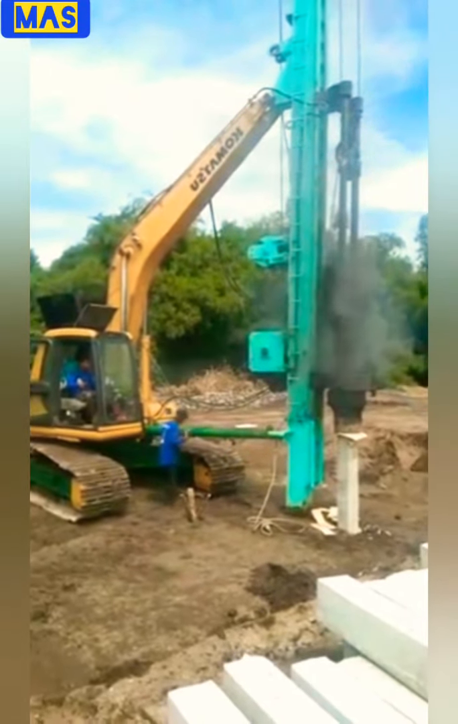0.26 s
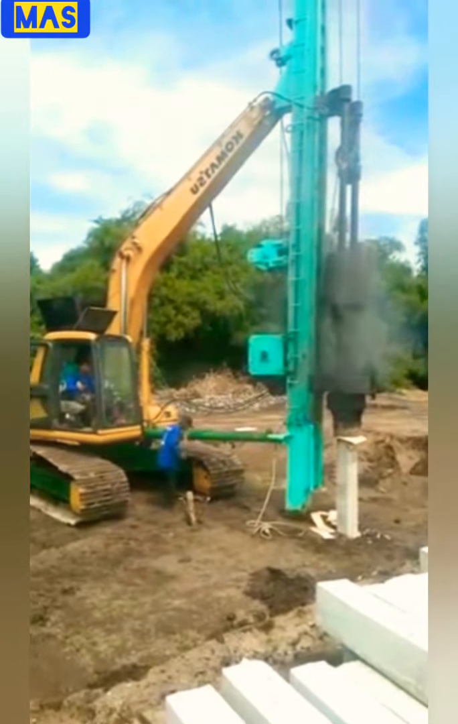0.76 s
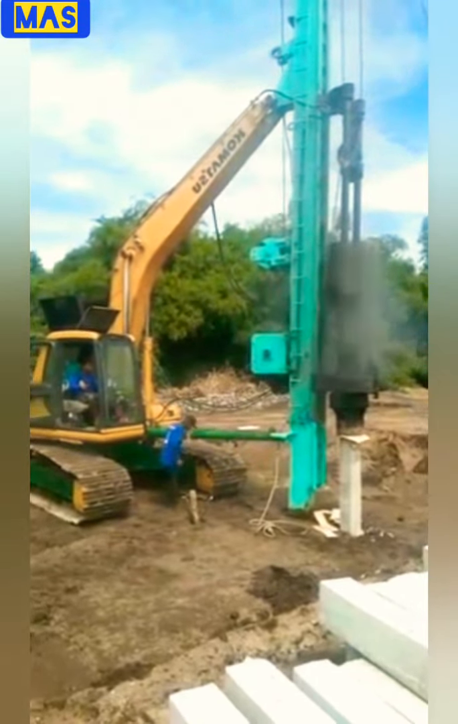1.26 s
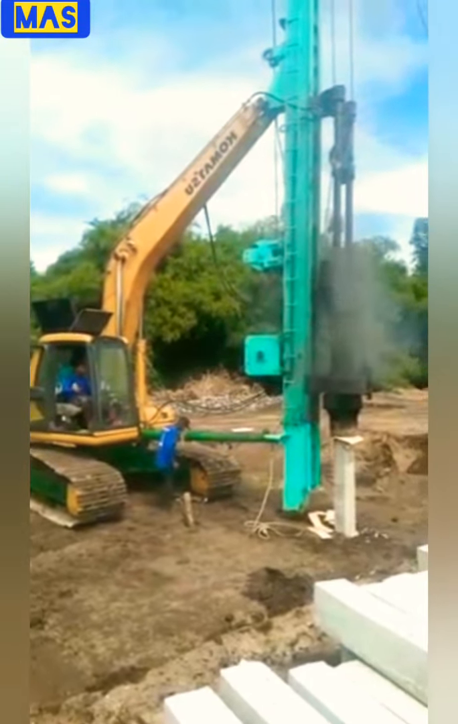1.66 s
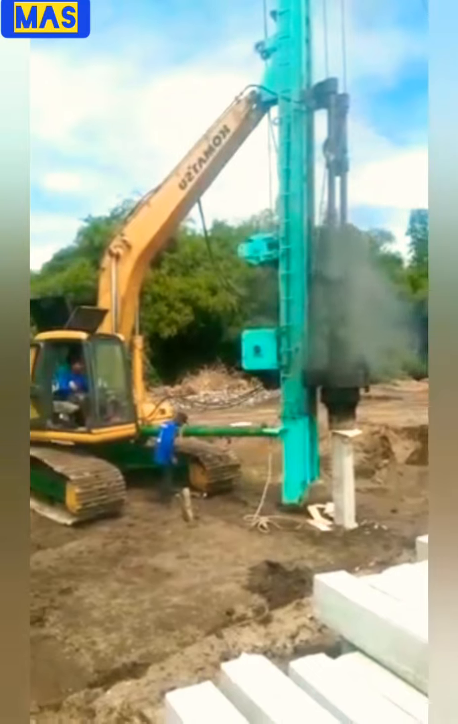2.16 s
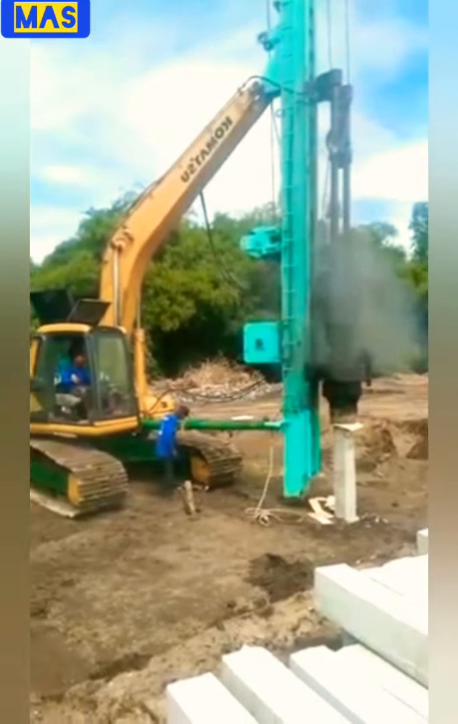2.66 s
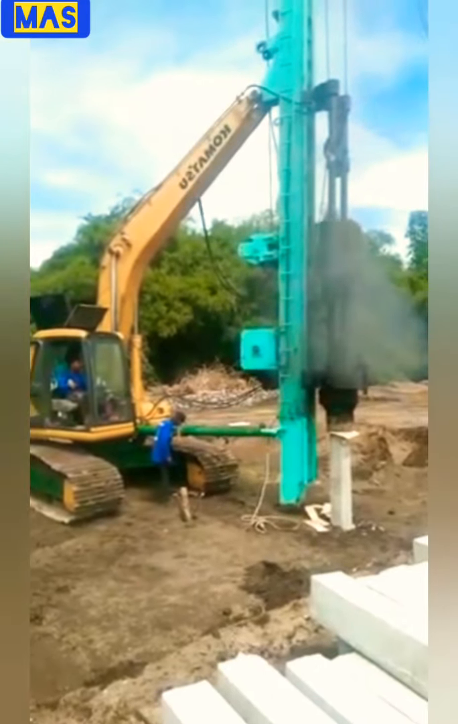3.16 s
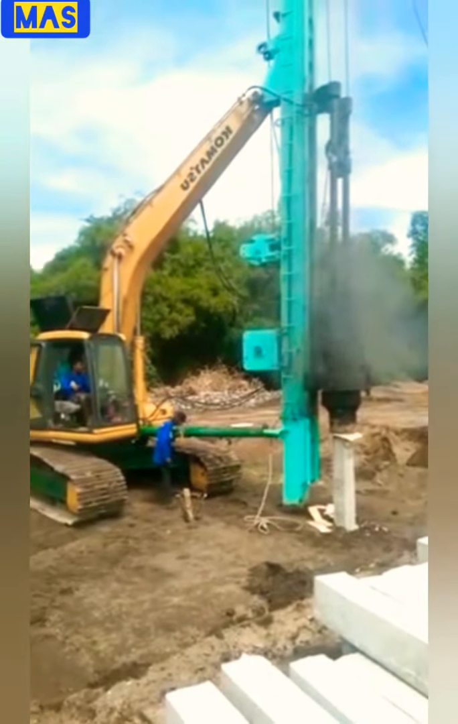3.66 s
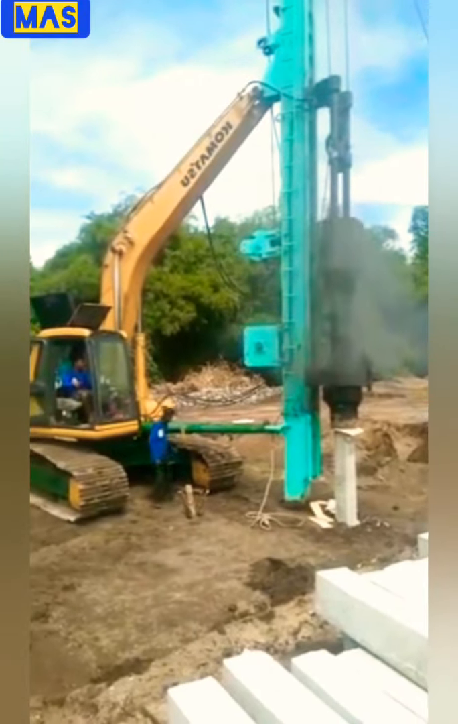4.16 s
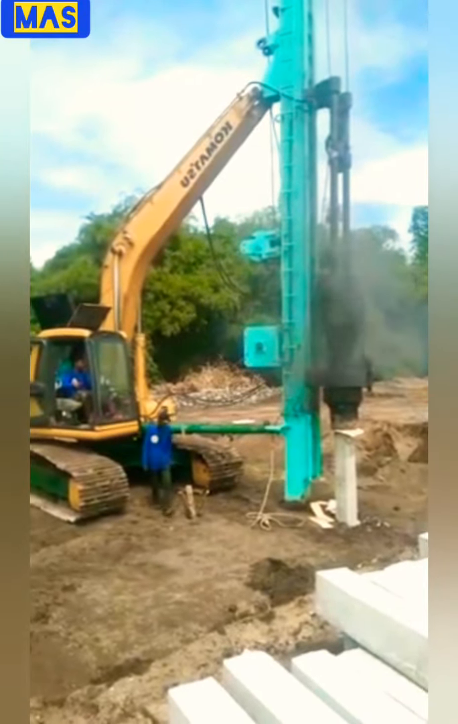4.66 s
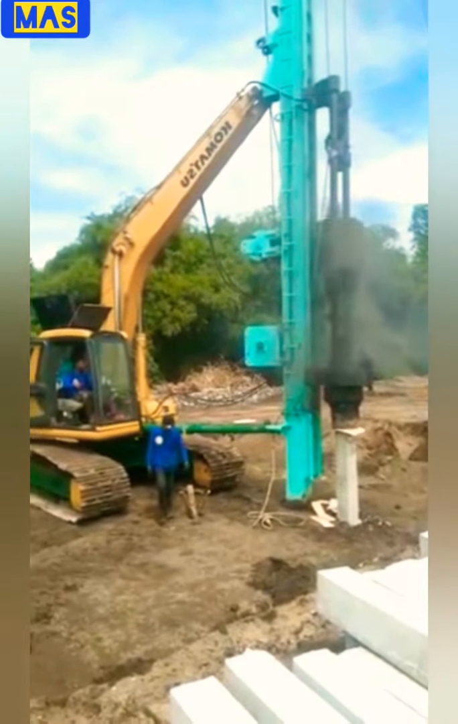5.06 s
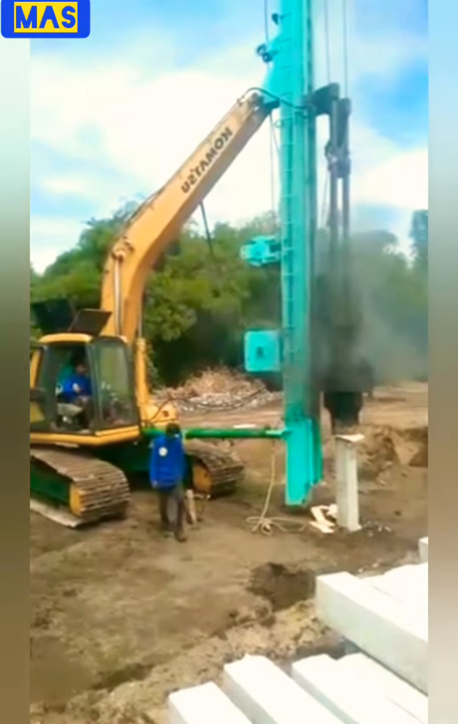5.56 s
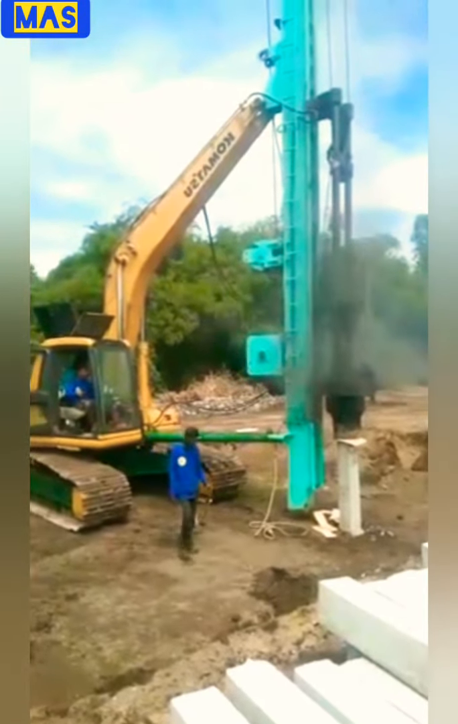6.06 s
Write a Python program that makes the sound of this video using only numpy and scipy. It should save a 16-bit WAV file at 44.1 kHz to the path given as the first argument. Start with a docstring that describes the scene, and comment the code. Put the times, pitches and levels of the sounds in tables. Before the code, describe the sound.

Outdoors on open ground, an excavator engine drones low and steadily, throbbing near 88 hertz, its level wavering and dipping slightly after each stroke. Over it, a diesel pile hammer strikes at about 0.2, 1.1, 2.0, 2.9, 3.8, 4.6 and 5.5 seconds. About 0.09 seconds before each blow, air puffs from the ports with a small knock and a thin falling whistle. The ram then cracks onto steel, bright and ringing briefly; some 0.035 seconds later a coarse gas blast bursts out. Around 0.14 seconds after impact comes a sharp hiss with a hollow boom gliding upward, then a softer repeat. Between strokes are faint ticks, fine sliding hiss and soft low throbs; a loose part clinks quietly near 5.0. The sound is centred, with a faint scattered tail, and the loudest bangs overload the microphone. It ends around 6.3 on engine drone.

```python
"""Open ground, with a diesel pile hammer driving a concrete pile over the drone of its excavator.
In each stroke the falling ram puffs air from the ports, strikes the anvil, and fires a blast of gas.
Rising, it uncovers the ports, which hiss and set the cylinder booming. Impacts are shaped noise and
dying modes, booms are gliding sines, and the drone is shaped noise with wavering tones.
The site adds faint scatter, and the loudest moments overload the microphone."""
import sys
import numpy as np
from scipy import signal
from scipy.fft import rfft, irfft
from scipy.io import wavfile

SR = 44100
rng = np.random.default_rng(int(sys.argv[2]) if len(sys.argv) > 2 else 0)


def persist_wave(psi):
    """Save psi, clipped to +-1, as 16-bit WAV."""
    counts = np.round(np.clip(psi, -1, 1) * 32767).astype(np.int16)
    wavfile.write(sys.argv[1], SR, np.atleast_2d(counts).T)


N = 277830  # length of the scene in samples
T = np.arange(SR // 2) / SR  # time within one event, s


def amp(db):
    """Decibels to gain."""
    return 10 ** (np.asarray(db) / 20)


def evened(x):
    """Scales to rms 1."""
    return x / np.sqrt(np.mean(x ** 2) + 1e-20)


def read(points, hz):
    """Reads a table on a log-frequency axis."""
    f, value = np.transpose(points)
    return np.interp(np.log(hz + 1), np.log(f + 1), value)


def add(mix, start_s, sound):
    """Mixes a sound in at its start time."""
    part = mix[max(round(start_s * SR), 0):][:len(sound)]
    part += sound[:len(part)]


def noise(colour, size):
    """Steady noise of a given colour, rms 1."""
    hz = np.fft.rfftfreq(size, 1 / SR)
    spectrum = rfft(rng.standard_normal(size)) * amp(read(colour, hz))
    return evened(irfft(spectrum, size))


def drift(hz):
    """Slow random wander, rms 1: noise under a smooth lowpass."""
    f = np.fft.rfftfreq(N, 1 / SR)
    spectrum = rfft(rng.standard_normal(N)) * np.exp(-(f / hz) ** 2)
    return evened(irfft(spectrum, N))


def churn(depth_db, hz):
    """The uneven, crackling strength of a turbulent jet: a random level in dB, rms gain 1."""
    f = np.fft.rfftfreq(len(T), 1 / SR)
    spectrum = rfft(rng.standard_normal(len(T))) / (1 + (f / hz) ** 2)
    return evened(amp(depth_db * evened(irfft(spectrum, len(T)))))


def gust(rise, hold, t60):
    """A flow that builds, holds and dies away; times in s."""
    build = np.minimum(T / rise, 1) ** 2
    return build * amp(-60 * np.maximum(T - rise - hold, 0) / t60)


def fade(x, t60s, rise, hold):
    """Gives each octave of x the same attack and its own decay."""
    centres = np.geomspace(100, 12800, 8)
    hz = np.fft.rfftfreq(len(x), 1 / SR)
    out = 0
    for centre, pick in zip(centres, np.eye(len(centres))):
        band = irfft(rfft(x) * read(np.c_[centres, pick], hz), len(x))
        out = out + band * gust(rise, hold, read(t60s, centre))
    return out


def brighten(x, treble_db):
    """A shelf that lifts or lowers the treble, from about 3 kHz up."""
    highpass = signal.butter(1, 3000, "high", fs=SR, output="sos")
    return x + (amp(treble_db) - 1) * signal.sosfiltfilt(highpass, x)


def ring(modes, pitch=1):
    """The dying tones of a struck body, each at a random phase."""
    out = 0
    for hz, db, t60 in modes:
        turns = hz * pitch * T + rng.random()
        out = out + amp(db - 60 * T / t60) * np.sin(2 * np.pi * turns)
    return out


def shake(modes, flow):
    """A body rung by a turbulent flow or a rattle of unit energy."""
    force = flow * rng.standard_normal(len(T))
    return signal.fftconvolve(force / np.linalg.norm(force), ring(modes))[:len(T)]


# Strokes of the hammer, timed from the blow; levels are relative within each sound. Columns:
# blow_s, steel_pitch (factor); puff_lead_s, puff_db; blast_lag_s, blast_db, blast_hold_s,
# blast_treble_db; port_lag_s, hiss_db, boom_db; soft_lag_s (port opening to soft hiss and boom),
# soft_hiss_db; top_tick_db
STROKES = [(0.2006, 1, 0.093, -1, 0.039, 1.9, 0.0089, 5.4, 0.15, -2, -4, 0.071, -28.5, -35),
           (1.0812, 0.97, 0.088, -6, 0.03, 2.16, .008, 6.8, 0.14, -3, -5, 0.078, -32, -30),
           (1.9636, 0.98, 0.091, -1, 0.031, 2.3, .017, 4.6, .142, -2, -6.5, .077, -31, -37),
           (2.8574, 0.96, 0.085, -2.5, .0385, 1.9, 0.015, 2.4, .1445, -0.5, -5.5, 0.071, -26.5, -32),
           (3.7525, 1, .0857, -0.5, 0.033, 1, 0.014, 4.5, 0.14, -4.5, -6, 0.073, -28, -34),
           (4.6428, 0.98, 0.092, -.5, 0.037, 1.1, 0.011, 7.2, .140, -1.5, -4, 0.082, -27.5, -34),
           (5.5459, 1, 0.081, -4, 0.035, 0.59, 0.0069, 5, 0.15, -11.5, -5, 0.075, -27, -35)]
(BLOW_S, STEEL_PITCH, PUFF_LEAD_S, PUFF_DB, BLAST_LAG_S, BLAST_DB, BLAST_HOLD_S, BLAST_TREBLE_DB,
 PORT_LAG_S, HISS_DB, BOOM_DB, SOFT_LAG_S, SOFT_HISS_DB, TOP_TICK_DB) = np.transpose(STROKES)
# Modes of ram and anvil, before the stroke's pitch factor and the attack: pitch_hz, level_db, t60_s
STEEL_MODES = [(2100, -23.5, 0.38), (2410, -17, 0.2), (2606, -12, 0.14), (4064, 3, 0.032), (4133, 8, 0.027),
               (4225, 8.5, 0.027), (4515, -8, 0.099), (5040, -8.5, 0.051), (6000, -20, 0.054),
               (8030, -4, 0.049)]
# Colour of the contact noise: freq_hz, level_db (per Hz, relative)
CRACK_COLOUR = [(100, -10.5), (1000, -8.5), (1800, 4), (2500, 5), (3200, -10), (3800, -5), (4300, 5),
                (5500, 1.5), (6500, 3), (7900, 0.5), (8500, -12), (16000, -31)]
BLOW_DB = -1.4  # the ram lands equally hard every time
REBOUND_S = 0.087  # the anvil rebounds this long after the blow


def blows():
    """Steel on steel: the ram scrapes, cracks onto the anvil and rings; the anvil rattles as it rebounds."""
    out = np.zeros(N)
    for blow_s, pitch in zip(BLOW_S, STEEL_PITCH):
        scrape = noise(CRACK_COLOUR, len(T)) * gust(rise=0.01, hold=0.012, t60=0.052)
        crack = noise(CRACK_COLOUR, len(T)) * gust(rise=0.0011, hold=0.0047, t60=0.044)
        rattle = noise(CRACK_COLOUR, len(T)) * gust(rise=0.003, hold=0.02, t60=0.16)
        rattle *= amp(-21) * churn(depth_db=3, hz=150)
        steel = ring(STEEL_MODES, pitch) * gust(rise=0.0038, hold=0.001, t60=5)
        rebound = shake(STEEL_MODES, gust(rise=0.0027, hold=0.0059, t60=0.03))
        add(out, blow_s - 0.018, amp(BLOW_DB - 35.5) * scrape)
        add(out, blow_s, amp(BLOW_DB) * (amp(-7) * crack + rattle + amp(-1) * steel))
        add(out, blow_s + REBOUND_S, amp(BLOW_DB - 22) * rebound)
    return out


# Cylinder and exhaust ports, rung by the blast, before its envelope: pitch_hz, level_db, t60_s
CYLINDER_MODES = [(329, -1, .36), (388, -6, .25), (420, -3, .45), (447, -7, .3), (747, -2, .25),
                  (831, -6, .2), (927, -2, .22), (1029, -6, .17), (1411, -6, .2), (2034, -6, .17),
                  (2208, 0, .22), (2560, -3, .1), (2651, -2, .2), (2810, -5, .26), (5080, -2, .08),
                  (6416, 2, .13)]
# Colour of the burnt gas: freq_hz, level_db (per Hz, relative)
BLAST_COLOUR = [(60, -2), (250, -2), (430, 11.5), (580, -2), (850, 10), (1400, -1), (2400, 9), (3200, 1),
                (4300, 1), (5700, -2.5), (7400, -0.5), (8600, -17.5), (16000, -42)]
# Decay of the burnt gas: freq_hz, t60_s
BLAST_DECAY = [(300, 0.47), (1000, 0.28), (2500, 0.23), (6000, 0.18), (12000, 0.12)]
# Duller colour of the gas that follows the blast: freq_hz, level_db (per Hz, relative)
SURGE_COLOUR = [(100, -10), (280, -5), (420, 8.5), (580, -13), (850, 3.5), (1300, -11), (2400, -4.5),
                (3300, -18.5), (5900, -18.5), (7700, -17), (8600, -30.5), (16000, -55)]


def blasts():
    """Burnt gas seeps, then bursts from the ports, rings the cylinder, and surges once more."""
    out = np.zeros(N)
    surge_decay = [(400, 0.28), (1000, 0.22), (2500, 0.085), (7000, 0.61)]  # freq_hz, t60_s
    for blast_s, db, hold, treble_db in zip(BLOW_S + BLAST_LAG_S, BLAST_DB, BLAST_HOLD_S, BLAST_TREBLE_DB):
        seep = noise(BLAST_COLOUR, len(T)) * gust(rise=0.011, hold=0.0027, t60=0.04)
        gas = fade(noise(BLAST_COLOUR, len(T)), BLAST_DECAY, rise=0.002, hold=hold)
        gas *= churn(depth_db=2.4, hz=160)
        struck = ring(CYLINDER_MODES) * gust(rise=0.005, hold=0.0046, t60=9)
        blown = shake(CYLINDER_MODES, gust(rise=0.013, hold=hold, t60=0.1))
        body = struck + amp(-6.5) * blown
        surge = fade(noise(SURGE_COLOUR, len(T)), surge_decay, rise=0.0088, hold=0.033)
        add(out, blast_s - 0.017, amp(db - 20.5) * seep)
        add(out, blast_s - 0.001, amp(db - 12.5) * brighten(gas, treble_db) + amp(db - 19) * body)
        add(out, blast_s + 0.039, amp(db - 19.5) * surge)
    return out


# Colour of the gas through the open port: freq_hz, level_db (per Hz, relative)
HISS_COLOUR = [(100, 1), (300, -1), (580, -14), (850, -5.5), (1500, -15), (2250, -2), (2900, -16.5),
               (3800, -9), (4400, -2), (5900, -4.5), (7700, 3.5), (8500, -12), (11000, -26.5), (16000, -36)]
HISS_HOLD_S, HISS_TREBLE_DB = 0.0074, -1.05
SOFT_HISS_HOLD_S, SOFT_HISS_TREBLE_DB = 0.0042, 10  # the second hiss is thinner


def hisses():
    """Gas leaks past the edge of the ram, then rushes through the open port: once sharply, once softly."""
    out = np.zeros(N)
    open_s = BLOW_S + PORT_LAG_S
    sharp = [(s, db, HISS_HOLD_S, HISS_TREBLE_DB) for s, db in zip(open_s, HISS_DB)]
    soft = [(s, db, SOFT_HISS_HOLD_S, SOFT_HISS_TREBLE_DB)
            for s, db in zip(open_s + SOFT_LAG_S, SOFT_HISS_DB)]
    for start_s, db, hold, treble_db in sharp + soft:
        rush = amp(-3) * noise(HISS_COLOUR, len(T)) * gust(rise=0.0021, hold=hold, t60=0.035)
        leak = amp(-13) * noise(HISS_COLOUR, len(T)) * gust(rise=0.0079, hold=0.014, t60=0.056)
        add(out, start_s, amp(db) * brighten(rush, treble_db))
        add(out, start_s - 0.008, amp(db) * leak)
    return out


def boom(start_hz, end_hz, glide, rise, t60):
    """A swing of air whose pitch settles as it dies."""
    hz = end_hz + (start_hz - end_hz) * np.exp(-T / glide)
    attack = np.sin(np.pi / 2 * np.minimum(T / rise, 1))
    decay = amp(-60 * np.maximum(T - rise, 0) / t60)
    return np.sin(2 * np.pi * np.cumsum(hz) / SR) * attack * decay


# Soft low throbs between strokes: start_s, level_db, pitch_hz
THROBS = [(.625, -27, 66), (1.574, -26.5, 70.6), (2.36, -28, 64.6), (3.628, -24, 76), (4.413, -26, 63),
          (5.349, -23, 72.3)]
BOOM_LAG_S = 0.0029  # the boom comes just behind the sharp hiss


def booms():
    """The cylinder gulps air like a blown bottle: a hard, lingering boom, a soft one, and low throbs."""
    out = np.zeros(N)
    for boom_s, db, soft_lag in zip(BLOW_S + PORT_LAG_S + BOOM_LAG_S, BOOM_DB, SOFT_LAG_S):
        swing = boom(start_hz=92.6, end_hz=144.3, glide=0.019, rise=0.018, t60=0.084)
        linger = amp(-19) * boom(start_hz=96, end_hz=150, glide=0.028, rise=0.03, t60=0.17)
        second = amp(-13.5) * boom(start_hz=116, end_hz=136, glide=0.02, rise=0.03, t60=0.17)
        lopsided = swing + 0.14 * swing ** 2  # a wide swing is lopsided
        add(out, boom_s, amp(db) * (lopsided + linger))
        add(out, boom_s + soft_lag - 0.003, second)
    for start_s, db, hz in THROBS:
        add(out, start_s, amp(db) * boom(start_hz=hz, end_hz=hz, glide=1, rise=0.026, t60=0.38))
    return out


# Colour of the spat air, also of the clink's chatter: freq_hz, level_db (per Hz, relative)
PUFF_COLOUR = [(100, -2.5), (420, -3), (580, -10.5), (850, -0.5), (1200, -7), (2300, 1), (3300, -12.5),
               (4500, -4.5), (5400, -11.5), (6600, -8), (7700, -8.5), (9000, -27), (16000, -35)]
PUFF_TREBLE_DB = -8.5
WHISTLE_LEAD_S, WHISTLE_DB, WHISTLE_START_HZ = 0.054, -36.5, 1350  # as the ram seals the ports


def puffs():
    """Air spat from the ports by the falling ram, a knock as it passes them, and a thin falling whistle."""
    out = np.zeros(N)
    for puff_s, db in zip(BLOW_S - PUFF_LEAD_S, PUFF_DB):
        flow = gust(rise=0.011, hold=0.013, t60=0.13)
        knock = np.roll(gust(rise=0.0015, hold=0.0042, t60=0.055), round(0.0112 * SR))
        strength = (flow + amp(-2.5) * knock) * churn(depth_db=1, hz=203)
        air = brighten(noise(PUFF_COLOUR, len(T)), PUFF_TREBLE_DB)
        add(out, puff_s - 0.011, amp(db - 15) * air * strength)
    for whistle_s in BLOW_S - WHISTLE_LEAD_S:
        tone = np.sin(2 * np.pi * WHISTLE_START_HZ * (T - 1.23 * T ** 2))  # falls steadily in pitch
        strength = gust(rise=0.005, hold=0.02, t60=0.13) * churn(depth_db=3, hz=120)
        add(out, whistle_s, amp(WHISTLE_DB) * tone * strength)
    return out


# A loose steel part clinks: start_s, level_db (relative)
CLINKS = [(5.027, -29)]
# Its modes, before the clink's envelope: pitch_hz, level_db, t60_s
CLINK_MODES = [(634, -7, 0.18), (1790, -5.5, 0.13), (2440, -1.5, .13), (3080, -16, 0.16), (3876, -9, 0.15),
               (6630, -5.5, 0.18)]
# Colour of the ticks and of the fine sliding hiss: freq_hz, level_db (per Hz, relative)
FIZZ_COLOUR = [(1500, -10), (3000, -5.5), (4300, 0), (7300, 2.5), (8100, -4), (8900, -14), (10800, -21),
               (12000, -44), (16000, -26)]
RISE_TICK_S, TOP_TICK_S = 0.256, 0.545  # from the blow: on the way up, and at the top of the flight
RISE_TICK_DB = -31  # on the same relative scale as the top ticks


def rig():
    """Two noise ticks in each flight of the ram, and a chattering clink from a loose part of the mast."""
    out = np.zeros(N)
    rising = [(s + RISE_TICK_S, RISE_TICK_DB) for s in BLOW_S]
    top = list(zip(BLOW_S + TOP_TICK_S, TOP_TICK_DB))
    for tick_s, db in rising + top:
        tick = noise(FIZZ_COLOUR, len(T)) * gust(rise=0.0009, hold=0.0032, t60=0.034)
        add(out, tick_s, amp(db - 8) * tick)
    for clink_s, db in CLINKS:
        chatter = amp(-7) * noise(PUFF_COLOUR, len(T)) * gust(rise=0.0027, hold=0.004, t60=0.14)
        tones = ring(CLINK_MODES) * gust(rise=0.0024, hold=0.005, t60=2) * churn(depth_db=4, hz=130)
        add(out, clink_s - 0.002, amp(db) * (amp(2.5) * tones + chatter))
    return out


def swell(peak, width):
    """A smooth hump, 0 to 1, that comes at the same delay after every blow; times in s."""
    since = np.arange(N)[:, None] / SR - BLOW_S
    return np.exp(-((since - peak) / width) ** 2).sum(1)


# Colour of the engine noise: freq_hz, level_db (per Hz, relative)
DRONE_COLOUR = [(20, -10), (45, -5.5), (90, 5), (180, -9), (420, -10), (600, -24), (800, -15),
                (1000, -17.5), (1500, -26), (2200, -23), (3000, -33), (6000, -57)]
# Engine and pump tones: pitch_hz, level_db (rms, before its drift), wander (rms share of the pitch)
DRONE_TONES = [(88, -41.5, 0.0075), (266, -58, 0.0109), (402, -48, 0.01087), (795, -60.5, 0.01116),
               (1020, -60, 0.01206), (1820, -66, 0.00414)]
# Slow course of the engine noise: time_s, level_db (relative)
ENGINE_LEVEL = [(0, -40.5), (.5, -36), (1.2, -39.5), (4.2, -40.5), (5.1, -41), (5.9, -37.5), (6.3, -39)]
# the engine noise dips after each boom and comes back before the next stroke
DIP_DB, DIP_S, DIP_WIDTH_S = -2.5, 0.36, 0.22
# the fine hiss swells while the ram slides upward
FIZZ_DB, SLIDE_DB, SLIDE_PEAK_S, SLIDE_WIDTH_S = -51, 3.5, 0.43, 0.12


def excavator():
    """Engine noise throbbing with the firing, wavering tones, and a fine hiss as the ram climbs."""
    tones = np.zeros(N)
    phases = []
    for hz, db, wander in DRONE_TONES:
        phase = 2 * np.pi * np.cumsum(hz * (1 + wander * drift(hz=9.3))) / SR
        tones += np.sqrt(2) * amp(db + 2 * drift(hz=3)) * np.sin(phase)
        phases.append(phase)
    engine_db = np.interp(np.arange(N) / SR, *np.transpose(ENGINE_LEVEL)) + 5
    engine_db += DIP_DB * swell(DIP_S, DIP_WIDTH_S) + 1.27 * drift(hz=25)
    throb = 1 + 0.25 * np.cos(phases[0])  # in step with the lowest tone
    clatter = noise(DRONE_COLOUR, N) * throb * amp(engine_db)
    fizz_db = FIZZ_DB + SLIDE_DB * swell(SLIDE_PEAK_S, SLIDE_WIDTH_S) + 1.34 * drift(hz=40)
    return tones + clatter + noise(FIZZ_COLOUR, N) * amp(fizz_db)


# Decay of the scatter around the site: freq_hz, t60_s
SITE_DECAY = [(100, 1), (500, 0.87), (2000, 0.11), (7000, 0.12), (12000, 0.86)]


def site(x):
    """Faint scatter from the ground, the machine and the trees: a decaying noise tail."""
    tail = fade(rng.standard_normal(len(T)), SITE_DECAY, rise=0.004, hold=0)
    return x + amp(-23) * signal.fftconvolve(x, tail / np.linalg.norm(tail))[:N]


def scene():
    """Hammer and excavator, heard alike in both ears; only the hammer and rig scatter."""
    hammer = blows() + blasts() + hisses() + booms() + puffs() + rig()
    mono = site(hammer) + excavator()
    return np.array([mono, mono])


EDGE_HZ = 15900  # upper band limit


def record(dry):
    """The microphone overloads with a soft knee and sheds the deep bass; then the band limit."""
    clipped = dry / (1 + dry ** 6) ** (1 / 6)
    lean = signal.sosfilt(signal.butter(2, 30, "high", fs=SR, output="sos"), clipped)
    lowpass = signal.firwin(401, EDGE_HZ, window=("kaiser", 8), fs=SR)
    return signal.oaconvolve(lean, lowpass[None], "same")


dry = scene()
out = record(dry)
persist_wave(out)
```